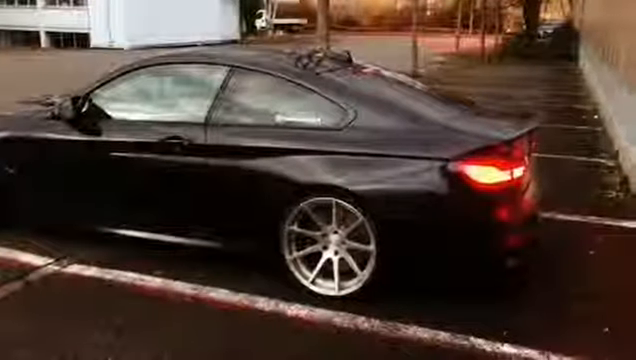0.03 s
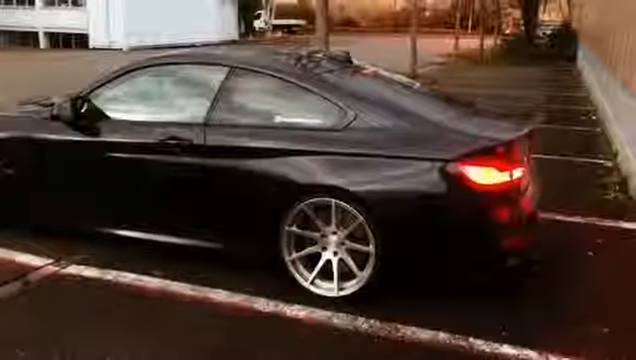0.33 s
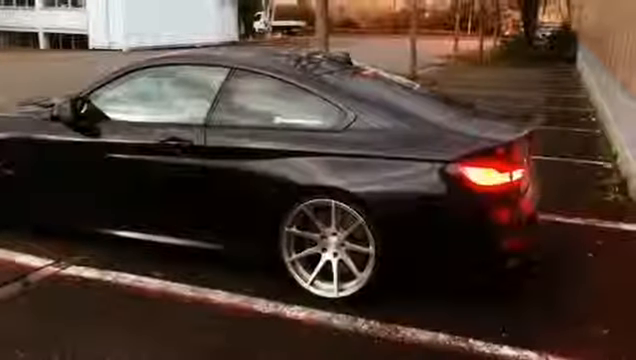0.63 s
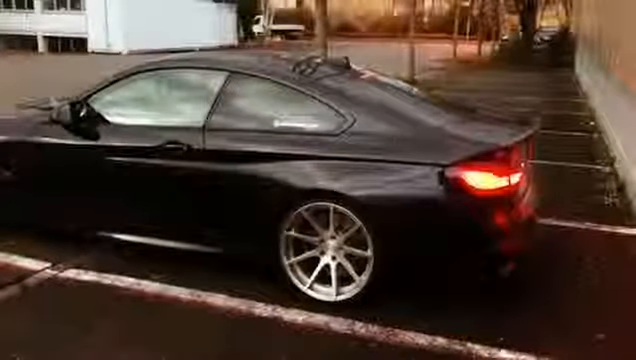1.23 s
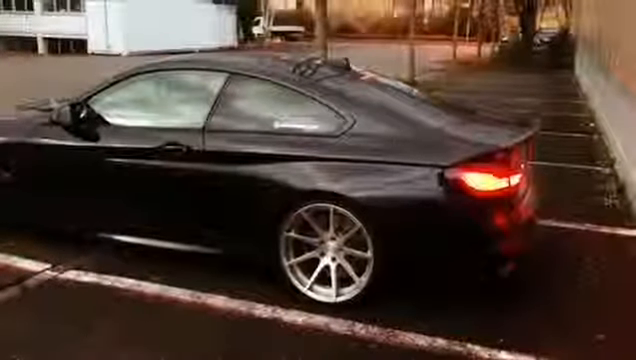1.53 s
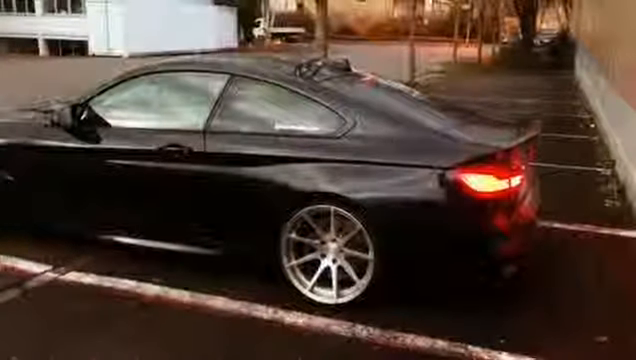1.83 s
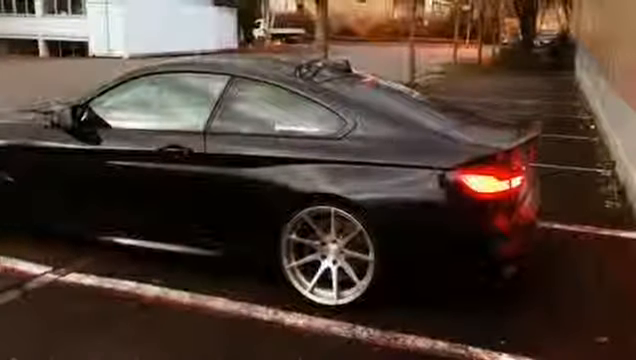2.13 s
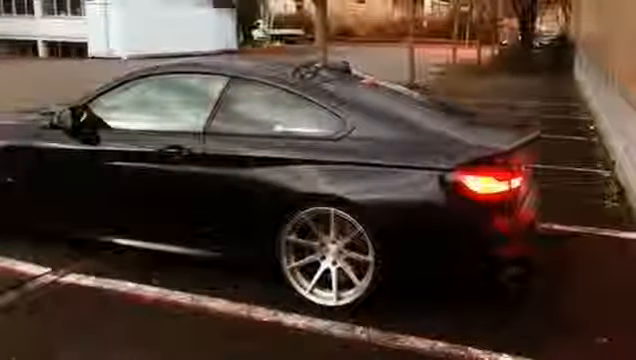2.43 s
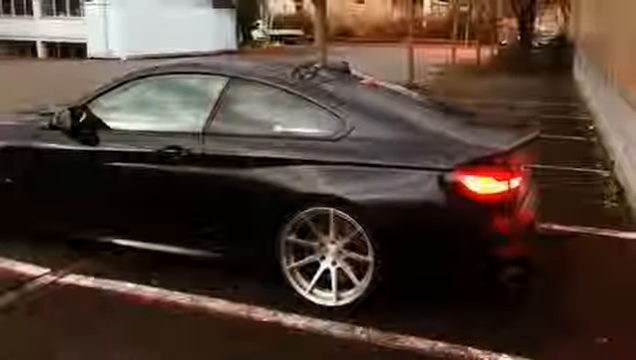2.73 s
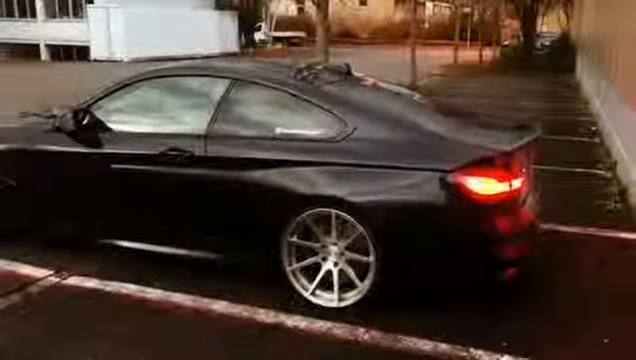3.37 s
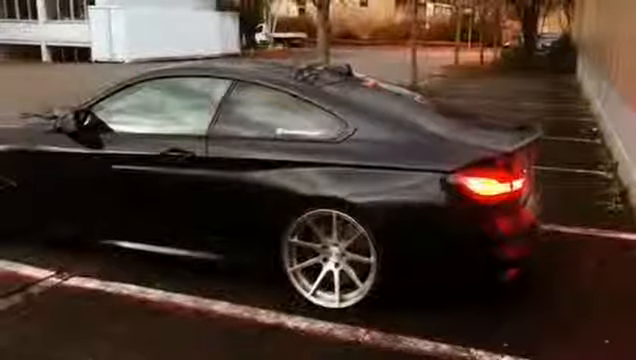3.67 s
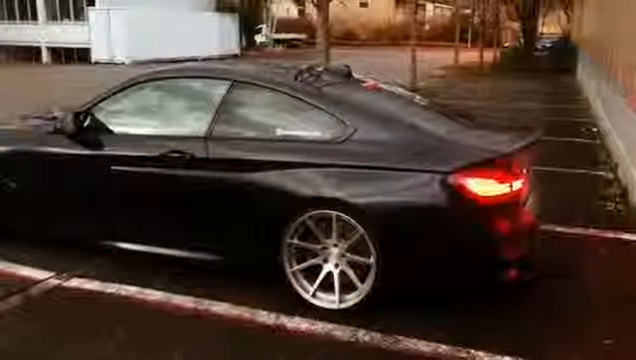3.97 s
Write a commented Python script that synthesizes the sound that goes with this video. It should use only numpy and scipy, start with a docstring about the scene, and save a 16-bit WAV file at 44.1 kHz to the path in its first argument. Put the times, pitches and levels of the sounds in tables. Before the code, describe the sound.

A car starts outdoors, after about three seconds of another engine idling nearby with a low, gently throbbing hum. A faint tick comes at 2.8 seconds. At 3.2 seconds the starter clacks and whirrs through four quick pulses, rising in pitch. From about 3.85 seconds the engine catches with rapid, booming, raspy firings, growing much louder than the idle right up to the end at 4 seconds.

```python
"""An outdoor car park, beside a concrete wall: a coupe is started while another engine idles nearby.
The solenoid clacks, the starter whirrs through four compression strokes, then the cylinders catch.
Firings of growing strength excite the resonances of the exhaust, boom and rasp, and just overload
the microphone. The wall returns one echo; the idle, its fan and distant traffic lie underneath."""
import sys
import numpy as np
from scipy import signal
from scipy.fft import rfft, irfft
from scipy.io import wavfile
from scipy.ndimage import uniform_filter1d

SR = 44100
rng = np.random.default_rng(int(sys.argv[2]) if len(sys.argv) > 2 else 0)


def store_wav(level_fs):
    """Save 16-bit WAV to argv[1]."""
    pcm = np.round(np.clip(np.atleast_2d(level_fs), -1, 1) * 32767)
    wavfile.write(sys.argv[1], SR, pcm.T.astype(np.int16))


N = 176400

# Crankshaft speed of the idling engine: (time [s], rate [turns/s])
SHAFT_SPEED = [(0, 15.3), (.8, 15.9), (1.1, 15.6), (1.8, 15.56), (2.4, 15.78), (2.8, 15.5), (3.6, 16)]


def catching_engine():
    """Impulse excitation: each firing's puff rings the exhaust; gas cracks and rasps at the tailpipe."""
    # (time [s], boom [dB], puff time constant [s], rasp [dB], crack [dB], crack frequency [Hz])
    firings = [(3.8605, -14.5, 0.00066, -34, -48, 1500), (3.8926, -10.5, 0.00081, -26.5, -38, 1050),
               (3.913, -6, .0005, -20, -36, 2200), (3.9364, -1, 0.00046, -26, -26, 2850),
               (3.955, -5.5, 0.00047, -20.5, -24.5, 2150), (3.976, -4, 0.00085, -13, -35, 2700),
               (3.989, 1.5, 0.00042, -7, -21.5, 3600)]
    # Response of the exhaust: (frequency [Hz], relative level [dB])
    exhaust = [(20, -42), (42, -4), (62, -0.5), (86, -6), (104, 1), (126, 4.5), (150, 1), (168, -2),
               (190, -14), (212, 3.5), (236, -10), (266, 9), (300, -2.5), (345, -3), (425, -18.5),
               (490, -10.5), (555, -28), (646, -16), (800, -32), (3000, -51)]
    # Spectrum of the escaping gas: (frequency [Hz], relative level [dB])
    rasp_spectrum = [(150, -24.5), (300, 16), (550, 2), (800, 1), (1050, -0.5), (1350, -2.5), (1700, -3),
                     (2250, -7), (2850, -16.5), (3500, -24.5), (5000, -26), (8000, -52), (11500, -45)]
    # Tailpipe modes: (frequency [Hz], T60 [s], relative level [dB])
    tailpipe_modes = [(620, 0.072, 0), (732.5, 0.062, 1.5), (1017, 0.13, 2), (1109, 0.082, 3.5),
                      (1350, 0.046, -27), (1684, 0.083, -4), (2080, .04, -20), (2460, 0.032, -24),
                      (2900, 0.024, -2)]
    puffs, cracks = 0, 0
    gas = undb(-28) * burst(3.8535, 0.002, 0.013)  # first crack of combustion
    for at, boom_db, puff_s, rasp_db, crack_db, crack_hz in firings:
        age = np.maximum(clock() - at, 0) / puff_s
        puffs += undb(boom_db) * age * np.exp(-age)
        gas += undb(rasp_db) * (burst(at, 0.001, .0038) + undb(-18) * burst(at, 0.004, .02))
        cracks += undb(crack_db) * burst(at, 0.001, 0.0024) * band(crack_hz, width_hz=780)
    rasp = body(gas * noise(), rasp_spectrum)
    tailpipe = undb(-6.5) * resonate(gas * noise(), tailpipe_modes)
    return cracks + rasp + tailpipe - body(puffs, exhaust)


def starter():
    """Load modulation: gears churn and brushes hiss; past each compression come a thump, whine and rasp."""
    # Course of cranking: (time [s], gear mesh frequency [Hz], level before load modulation [dB])
    cranking = [(3.22, 600.2, -54), (3.26, 756.7, -43), (3.34, 952.7, -41), (3.405, 1041, -49),
                (3.455, 1075, -42.5), (3.515, 998.7, -46), (3.535, 1230, -44.5), (3.57, 1012, -45),
                (3.6, 995.4, -43), (3.628, 979, -55), (3.645, 1380, -41.5), (3.67, 1261, -45.5),
                (3.70, 1210, -43.5), (3.73, 1098, -49), (3.748, 1389, -41), (3.78, 1196, -48),
                (3.805, 1090, -42), (3.84, 1069, -40.5), (4.0, 1398, -27.5)]
    # Free runs after compression: (time [s], duration [s], clutch level [dB], rasp frequency [Hz])
    releases = [(3.371, 0.12, -57.5, 7330), (3.521, 0.11, -59.5, 7600), (3.636, 0.076, -55, 7330),
                (3.742, 0.075, -53.5, 7430)]
    # Spectra of clutch, brushes, gears and block: (frequency [Hz], relative level [dB])
    clutch_spectrum = [(2500, -30), (4000, -11), (5500, -14), (6800, -7), (7350, 7), (7850, 0), (8200, 0),
                       (8800, -1), (9600, -15), (11500, -28)]
    brush_spectrum = [(1000, -21), (2000, 0.5), (2900, -0.5), (3400, 3.5), (3900, 4), (4700, -6),
                      (6300, -12), (7500, -12), (9000, -11), (11500, -27)]
    gear_spectrum = [(150, -12.5), (300, 4.5), (440, -6), (600, 0), (780, 4.5), (900, 2.5), (1030, 2),
                     (1500, -4), (1680, -5.5), (2020, -8.5), (2950, -8.5), (3400, -15.5), (3860, -17),
                     (4600, -15), (5200, -18), (6400, -22), (11500, -29.5)]
    block_spectrum = [(60, -26), (130, -2), (200, -4.5), (310, -6.5), (420, -13.5), (900, -42)]
    # Starter and bell housing modes: (frequency [Hz], T60 [s], relative level [dB])
    housing_modes = [(620, 0.1, -1), (780, .12, -1), (1024, 0.11, 2), (1071, 0.1, -5), (1160, 0.086, -3),
                     (1224, .12, -1), (1365, 0.11, -2), (1647, .08, 1.5), (3830, .03, -3)]
    load_swing_db, scrape_rise_hz_per_s, attack_share = 5, 5000, 0.29
    t = clock()
    mesh_cycles = np.cumsum(curve(cranking) * (1 + .016 * walk(250))) / SR
    mesh_tone = undb(2 * walk(90)) * np.sin(2 * np.pi * mesh_cycles)
    chatter = body(noise(), clutch_spectrum)
    free, clutch, thumps = 0, 0, 0
    for at, length, db, hz in releases:
        swell = np.sin(np.interp((t - at) / length, [0, attack_share, 1], [0, np.pi / 2, np.pi]))
        from_middle_s = np.clip(t - at, 0, length) - length / 2
        scrape = band(hz + scrape_rise_hz_per_s * from_middle_s, width_hz=290)
        free += swell  # 0 under load, 1 when the clutch overruns
        clutch += undb(db) * swell * (chatter + undb(3) * scrape)
        thumps += undb(-36.5) * burst(at, 0.0075, 0.021)
    running = t > cranking[0][0]
    drive = undb(curve(cranking, column=2) + load_swing_db * (free - .5)) * running
    teeth = np.diff(np.floor(mesh_cycles), prepend=0) * undb(3 * noise())  # one uneven impact a tooth
    impacts = unit(teeth * np.sign(noise()))
    rattle = unit(impacts + noise())
    brushes = undb(-55 + 3.5 * walk(70)) * running * body(rattle, brush_spectrum)
    housing = undb(-5) * free * resonate(noise(), housing_modes)
    gears = drive * (undb(-0.5) * body(rattle, gear_spectrum) + housing)
    whine = undb(-1) * drive * free * mesh_tone
    return panels(gears + clutch) + brushes + whine + body(thumps * noise(), block_spectrum)


def solenoid():
    """Impact noise: a faint tick, then the plunger slides and slams the pinion into the flywheel."""
    # Slide and slam: (time [s], level [dB], attack [s], decay [s])
    clacks = [(3.208, -37.5, 0.018, 0.042), (3.2296, -29.5, 0.0009, 0.01)]
    # Response of the struck parts: (frequency [Hz], relative level [dB])
    clack_spectrum = [(200, -17), (500, 1), (800, 5), (1020, 2), (1300, -0.5), (1700, 2.5), (2200, -13),
                      (3000, -9), (3900, -1), (5200, -13), (6600, -15.5), (8000, -19), (10300, -22),
                      (11200, -15.5), (12000, -49)]
    tick_spectrum = [(800, -17), (2500, 9), (6000, -9), (11000, -12)]
    blows = sum(undb(db) * burst(at, attack, decay) for at, db, attack, decay in clacks)
    tick = undb(-48.5) * burst(2.795, .003, .014)
    return body(blows * noise(), clack_spectrum) + body(tick * noise(), tick_spectrum)


def panels(x):
    """Interference: quick reflections between bonnet, floor pan and ground make the treble hollow."""
    scatter = burst(0.00057, .001, 0.0025) * noise()
    reflections = undb(-4.5) * convolve(x, scatter)
    highpass = signal.butter(3, 910, "high", fs=SR, output="sos")
    return 0.89 * (x + signal.sosfilt(highpass, reflections))


def car_park(x):
    """Reflection and scattering: one echo from the wall, a short tail from ground and buildings."""
    t, wall_delay_s = clock(), .0095
    echo = undb(-11.5) * np.interp(t - wall_delay_s, t, x)
    scatter = burst(0.012, 0.0063, 0.059) * body(noise(), [(100, -9), (2000, 13), (11000, -8.0)])
    return x + echo + undb(-18.5) * convolve(x, scatter)


def idling_engine():
    """Harmonic series: a steady note, four firings a turn, among wavering orders from unequal cylinders."""
    # Exhaust harmonics: (order [multiple of shaft rate], relative level [dB])
    orders = [(3, -26.5), (4, -1), (5, -18), (6, -29), (7, -24), (9, -24), (10, -24.5), (11, -27),
              (12, -24), (13, -36.5), (15, -45), (17, -46.5), (20, -44), (29, -39), (32, -51.5),
              (33, -36.5)]
    turns = np.cumsum(curve(SHAFT_SPEED) * (1 + 0.0019 * walk(6.23))) / SR
    note, beat = 0, lope()
    for order, db in orders:
        waver = .025 if db > -10 else 0.18
        amplitude = 1 + waver * (walk(8.1) + 1j * walk(5.1)) / np.sqrt(2)  # level and phase waver
        if order >= 9:
            amplitude *= beat
        phase = 2 * np.pi * (order * turns + rng.random())
        note += undb(db) * np.real(amplitude * np.exp(1j * phase))
    return undb(-26) * unit(note)


def lope():
    """Amplitude modulation: the idle throbs once per two-turn cycle, more heavily every second cycle."""
    cycle_phase = np.pi * np.cumsum(curve(SHAFT_SPEED)) / SR
    return undb(2.2 * np.cos(cycle_phase) - .9 * np.cos(cycle_phase / 2))


def fan():
    """Blade-passing tone: the idling engine's cooling fan hums, drifting in level and pitch."""
    gain = undb(-51 + 2 * walk(4.6))
    blade_hz = 161 * (1 + 0.0041 * walk(3.4))
    return gain * np.sin(2 * np.pi * np.cumsum(blade_hz) / SR)


def background():
    """Filtered noise: fan rush and far traffic, faint whistles, a loping rumble and the bay's resonance."""
    # Rush of fan, belts and distant town: (frequency [Hz], relative level [dB])
    rush_spectrum = [(20, -11), (45, -4), (90, -18.5), (125, -6), (165, -2), (205, -5.5), (240, -8.5),
                     (320, -6.5), (405, -18.5), (460, -9.5), (580, -19.5), (860, -19.5), (1400, -18.5),
                     (2050, -24.5), (2700, -27.5), (3170, -24), (4100, -33), (5000, -36), (5900, -39),
                     (7500, -45), (11500, -53)]
    # Belt and intake whistles: (frequency [Hz], bandwidth [Hz], level [dB])
    whistle_bands = [(3153, 440, -64.5), (4900, 340, -76), (5870, 300, -79.5)]
    # Course of the rumble before the lope: (time [s], level [dB])
    rumble_levels = [(0, -47), (1.15, -57.5), (1.4, -43.5), (1.7, -44.5), (1.95, -53), (4.0, -49)]
    # Spectrum of the rumble: (frequency [Hz], relative level [dB])
    rumble_spectrum = [(60, -38), (130, -9.5), (180, 3), (240, 3.5), (290, -7.5), (350, -10.5), (450, -21),
                       (1000, -55.5)]
    # Modes of the idling engine's bay: (frequency [Hz], T60 [s], relative level [dB])
    bay_modes = [(516, 0.11, -3), (681, 0.087, -2.5), (765, 0.079, -6.5), (930, 0.058, -6),
                 (1166, 0.052, -8.5), (1400, 0.026, -7.5)]
    rush = undb(-45.5 + .5 * walk(25)) * body(noise(), rush_spectrum)
    whistles = 0
    for hz, width_hz, db in whistle_bands:
        gain = undb(db + 1.2 * walk(10.02))
        whistles += gain * band(hz * (1 + .012 * walk(10)), width_hz)
    rumble = undb(curve(rumble_levels)) * lope() * body(noise(), rumble_spectrum)
    bay = undb(-52.5) * resonate(noise(), bay_modes)
    return rush + whistles + rumble + bay


def body(x, spectrum, size=8192):
    """Minimum-phase filtering: a folded cepstrum turns (frequency [Hz], level [dB]) into a response."""
    hz, db = np.array(spectrum).T
    bin_hz = np.fft.rfftfreq(size, 1 / SR)
    log_gain = np.log(undb(np.interp(np.log(bin_hz + 1), np.log(hz), db)))
    cepstrum = irfft(log_gain)
    cepstrum[1:size // 2] *= 2
    cepstrum[size // 2 + 1:] = 0
    return convolve(x, irfft(np.exp(rfft(cepstrum))))


def resonate(x, modes):
    """Modal superposition: x drives damped sines; neighbours swing in opposite directions, as in a pipe."""
    t = clock()[:SR // 2]
    response = sum((-1) ** k * undb(db - 60 * t / t60) * np.sin(2 * np.pi * hz * t)
                   for k, (hz, t60, db) in enumerate(modes))
    return convolve(x, response)


def convolve(x, response):
    """Convolution with an impulse response scaled to unit energy."""
    return signal.fftconvolve(x, response / np.linalg.norm(response))[:N]


def band(hz, width_hz):
    """Frequency shifting: low-passed noise becomes a narrow band around a centre that may move."""
    lowpass = signal.butter(2, width_hz / 2, fs=SR, output="sos")
    envelope = signal.sosfilt(lowpass, noise() + 1j * noise())
    carrier = np.exp(2j * np.pi * np.cumsum(hz * np.ones(N)) / SR)
    return unit(np.real(envelope * carrier))


def burst(start_s, attack_s, decay_s):
    """Transient envelope: linear rise, exponential decay."""
    age = clock() - start_s
    return np.clip(age / attack_s, 0, 1) * np.exp(-np.maximum(age - attack_s, 0) / decay_s)


def walk(rate_hz):
    """Random fluctuation: twice-smoothed steps, at rms 1."""
    hold = int(SR / rate_hz)
    steps = np.repeat(rng.standard_normal(N // hold + 1), hold)
    return unit(uniform_filter1d(uniform_filter1d(steps, hold), hold)[:N])


def curve(table, column=1):
    """Linear interpolation of one column over time."""
    rows = np.array(table)
    return np.interp(clock(), rows[:, 0], rows[:, column])


def noise():
    """White Gaussian noise."""
    return rng.standard_normal(N)


def clock():
    """Time of each sample [s]."""
    return np.arange(N) / SR


def unit(x):
    """Normalisation to rms 1."""
    return x / np.sqrt(np.mean(x ** 2))


def undb(db):
    """Decibels to amplitude ratio."""
    return 10 ** (np.asarray(db) / 20)


def scene():
    """Superposition: the starting car and its reflections over the idling one, in one channel."""
    coupe = car_park(solenoid() + starter() + catching_engine())
    return (coupe + idling_engine() + fan() + background())[None]


def record(dry):
    """Saturation and band limiting: the microphone rounds the loudest peaks; the top treble is cut."""
    ceiling, cutoff_hz = 1.1, 11700
    rounded = dry / (1 + (dry / ceiling) ** 6) ** (1 / 6)
    return signal.sosfilt(signal.ellip(8, .2, 70, cutoff_hz, fs=SR, output="sos"), rounded)


dry = scene()
out = record(dry)
store_wav(out)
```